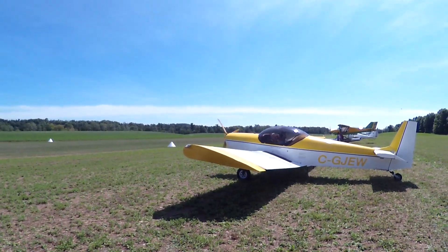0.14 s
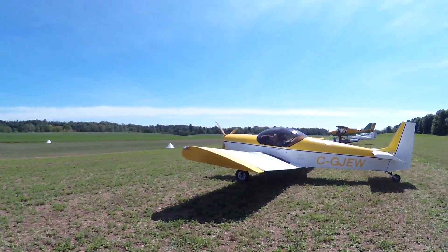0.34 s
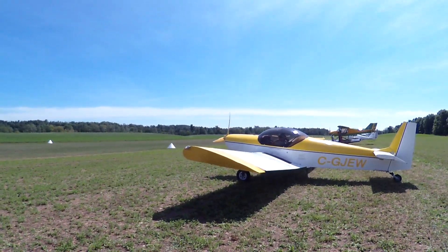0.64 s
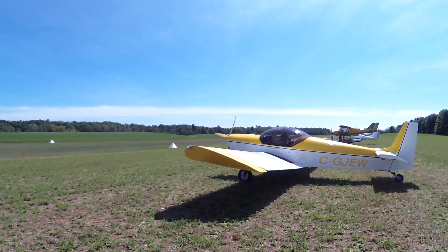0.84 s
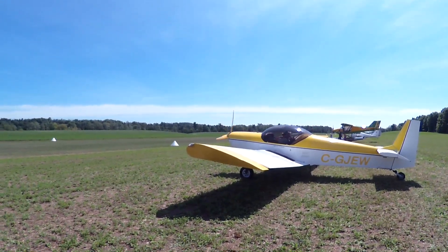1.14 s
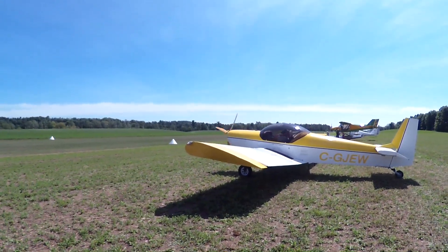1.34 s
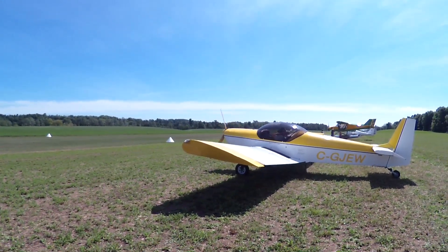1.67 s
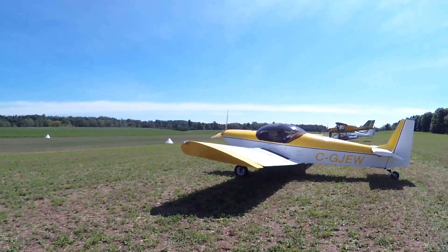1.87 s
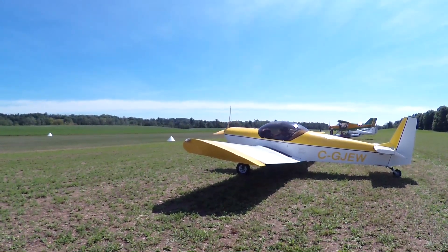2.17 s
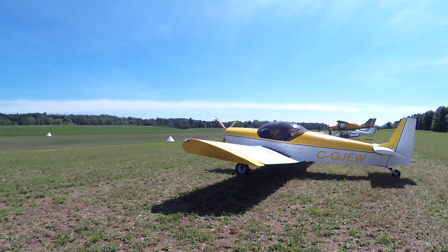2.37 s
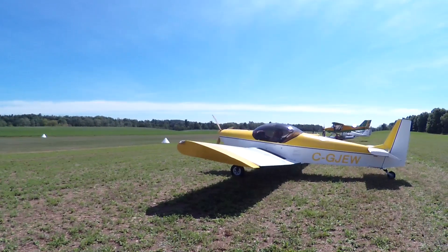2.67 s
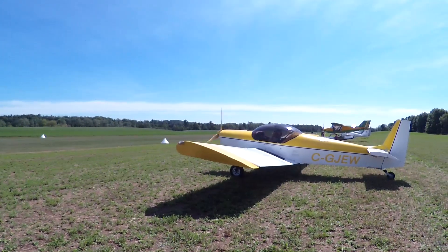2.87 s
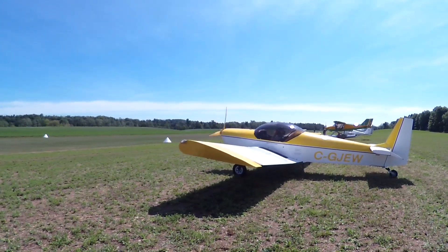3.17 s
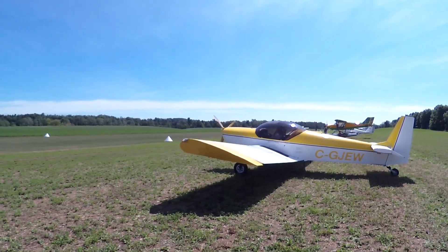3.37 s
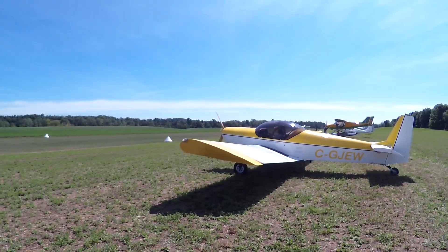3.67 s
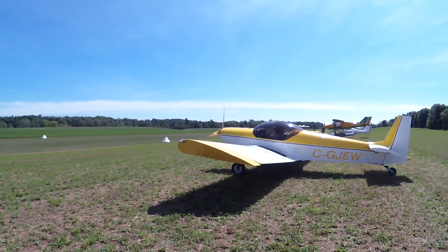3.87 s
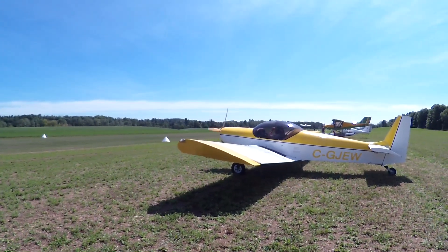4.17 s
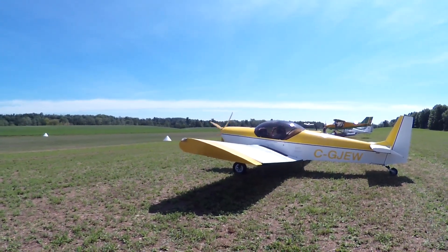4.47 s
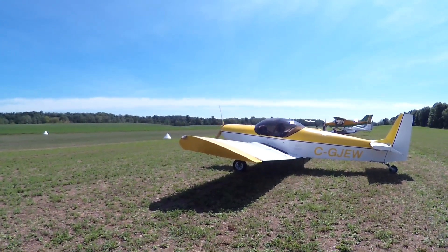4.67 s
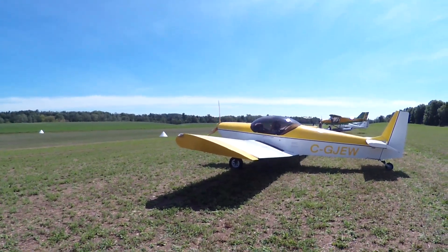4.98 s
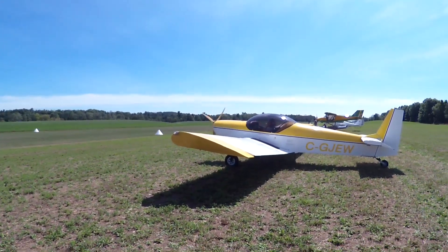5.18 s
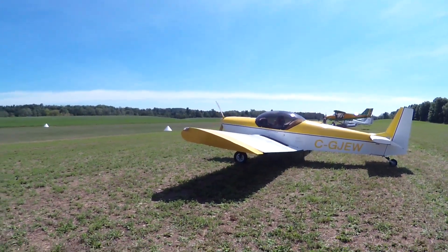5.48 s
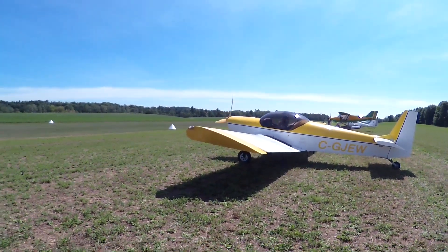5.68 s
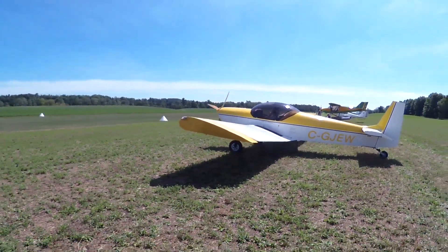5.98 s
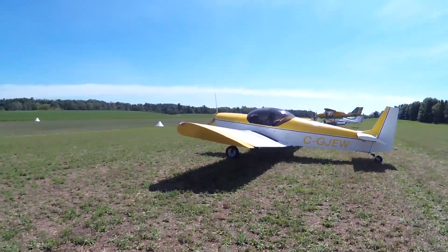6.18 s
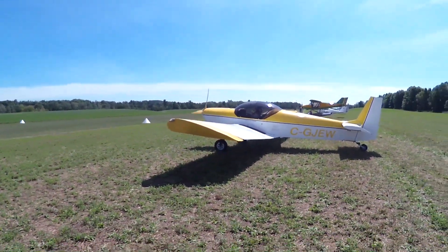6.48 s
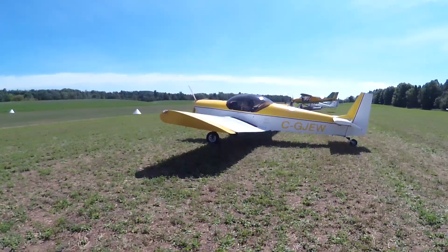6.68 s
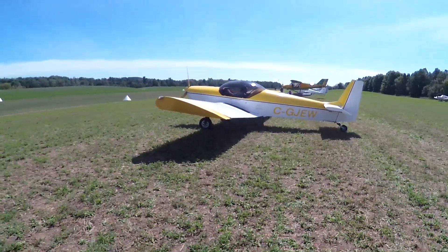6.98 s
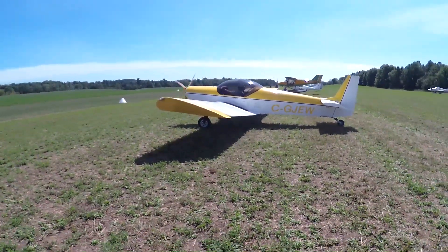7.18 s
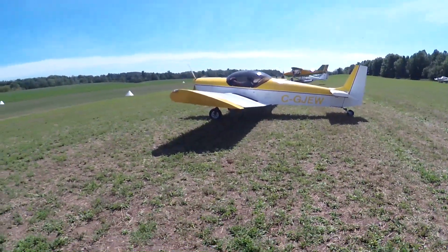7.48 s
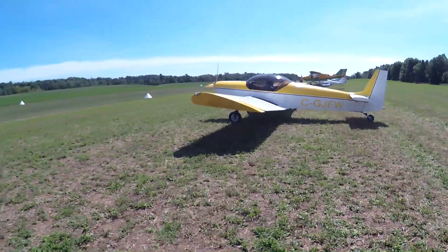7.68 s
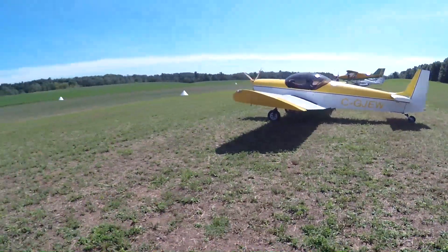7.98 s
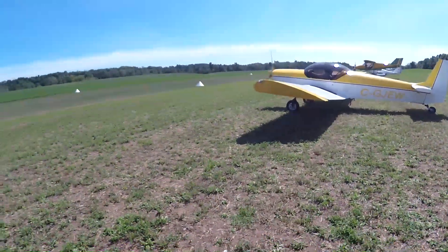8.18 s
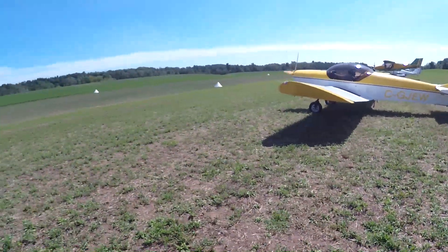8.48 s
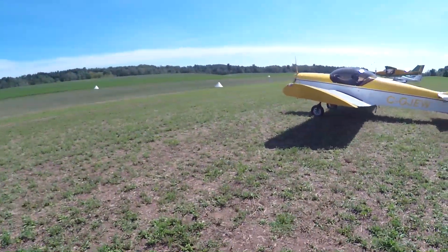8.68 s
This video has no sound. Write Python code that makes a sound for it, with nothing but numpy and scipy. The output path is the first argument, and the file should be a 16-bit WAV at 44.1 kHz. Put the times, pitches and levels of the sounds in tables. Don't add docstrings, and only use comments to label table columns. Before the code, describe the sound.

Continuous aircraft idle in the open air, already running at the start. Heavy bass drone carries a fast, uneven propeller flutter, dry valve rattle and broad cooling-air hiss. Distant engine drone adds slow pulsing. Light wind touches the microphone at first and midway; near the end the microphone turns away, the balance shifts and low gusts buffet hard.

```python
import sys
import numpy as np
from scipy import signal
from scipy.fft import rfft, irfft, next_fast_len
from scipy.io import wavfile
from scipy.ndimage import uniform_filter1d

SR = 44100
rng = np.random.default_rng(int(sys.argv[2]) if len(sys.argv) > 2 else 0)


def gain_from_db(level_db):
    decades = np.asarray(level_db, float) / 20
    return 10 ** decades


def dump(signal):
    limited = np.clip(np.atleast_2d(signal).T, -1, 1)
    pcm = np.round(limited * 32767).astype(np.int16)
    wavfile.write(sys.argv[1], SR, pcm)


N = 389403
SIDES = np.array([[.5], [-.5]])


def rms_one(x):
    return x / np.sqrt(np.mean(x ** 2) + 1e-20)


def noise():
    return rng.standard_normal(N)


def cosine(turns):
    return np.cos(2 * np.pi * turns)


def in_time(rows):
    s, *columns = np.transpose(rows)
    return [np.interp(np.arange(N) / SR, s, c) for c in columns]


def coloured(x, spectrum):
    size = next_fast_len(N)
    hz, db = np.transpose(spectrum)
    bin_hz = np.arange(size // 2 + 1) * SR / size
    gain = gain_from_db(np.interp(np.log(bin_hz + 1), np.log(hz), db, -120))
    return rms_one(irfft(rfft(x, size) * gain, size)[..., :N])


def drift(rate_hz):
    r = np.exp(-80 * np.pi * rate_hz / SR)
    slow = signal.lfilter([1], [1, -2 * r, r * r], rng.standard_normal(N // 40 + 2002))[2000:]
    return np.interp(np.arange(N) / 40, np.arange(len(slow)), rms_one(slow))


def each_turn(turns, spread_db):
    gains = gain_from_db(spread_db * rng.uniform(-1.14, 2.27, 1000))
    return gains[np.floor(turns).astype(int) + 2]


def resonate(x, hz, width_hz):
    r = np.exp(-np.pi * width_hz / SR)
    poles = [1, -2 * r * np.cos(2 * np.pi * hz / SR), r * r]
    return signal.lfilter([(1 - r * r) / 2, 0, (r * r - 1) / 2], poles, x)


def split(x, hz):
    low = signal.sosfilt(signal.butter(2, hz, fs=SR, output="sos"), x)
    return low, x - low


def swells(rows, rise_s, fall_s):
    s, db = np.transpose(rows)[:, :, None]
    late_s = np.arange(0, N, 40) / SR - s
    bumps = db * np.exp(-(late_s / np.where(late_s < 0, rise_s, fall_s)) ** 2)
    return np.interp(np.arange(N) / 40, np.arange(late_s.shape[1]), bumps.max(axis=0))


# time in seconds, firings per second.
SPEED_FIRINGS = [(0.0, 67.11), (0.3, 67.63), (0.6, 68.52), (0.9, 69.78), (1.2, 69.85), (1.6, 70.08),
                 (2.0, 70.81), (3.0, 71.22), (4.0, 71.41), (4.8, 71.35), (5.2, 71.87), (5.6, 71.64),
                 (6.0, 71.94), (7.0, 72.18), (7.5, 71.8), (8.0, 72.21), (8.4, 72.21), (8.83, 72.65)]


def crankshaft():
    first_firing, first_blade = -.4, .2
    blades_per_cycle = 2.64
    speed, = in_time(SPEED_FIRINGS)
    cycle = (np.cumsum(speed) / SR + first_firing) / 4
    blade = blades_per_cycle * (cycle - cycle[0]) + first_blade
    return speed, cycle, blade


# time in seconds, aim aside -1..1, blade-tip share of the slap 0-1,
# ground echo lag in ms.
MIC_SWING = [
    (0, -0.034, 0.22, .55),
    (5.5, 0.028, 0.04, 0.58),
    (6.6, -0.19, 0, 0.63),
    (7.4, -0.15, 0.03, 0.66),
    (7.8, 0.49, .45, 0.54),
    (8.15, .95, 0.46, 0.43),
    (8.3, 0.91, .4, 0.27),
    (8.83, .99, .4, 0.28),
]


def microphone():
    aside, tips, lag_ms = in_time(MIC_SWING)
    off_axis = np.tanh(5 * np.abs(aside))
    return aside, np.clip(aside, 0, 1), off_axis, np.clip(tips, 0, 1), lag_ms


# multiple of the four-stroke cycle, level in
# dB.
EXHAUST_ORDERS = [(1, -53), (2, -88), (3, -42), (4, 1.5), (5, -29.5), (6, -15.5), (7, -33), (8, -14.5),
                  (9, -61), (10, -12), (11, -60), (12, -12.5), (13, -26.5), (14, -53), (15, -37),
                  (16, -16.5), (17, -46), (18, -31), (19, -58), (20, -38.5),
                  (34, -38), (35, -45), (37, -37.5), (39, -45), (47, -40.5)]


def exhaust(cycle, second_db, shade_db):
    silencer_lag_turns, silencer_spread_orders, bank_lead_turns = .7, 4, .17
    out = 0
    for order, db in EXHAUST_ORDERS:
        uneven = order % 4 > 0
        lag = silencer_lag_turns * (1 - np.exp(-max(order - 4, 0) / silencer_spread_orders))
        lag = lag - bank_lead_turns * uneven
        waver = (0.012 if uneven else .007) * (min(order, 20) - 4)
        level_db = db + 10.6 * waver * drift(10)
        level_db = level_db + (second_db + 11.5) * (order == 8) + shade_db * (9 < order < 14)
        out = out + gain_from_db(level_db) * cosine(order * cycle - lag + 0.45 * waver * drift(1.4))
    return np.sqrt(2) * out


# frequency in Hz, density in dB per Hz.
RUMBLE_SPECTRUM = [(15, -37), (25, -16), (46, 11.5), (78, 8), (118, 10.5), (288, 10), (500, -68),
                   (650, -73), (1100, -120)]


def low_rumble():
    return gain_from_db(-34.5) * coloured(noise(), RUMBLE_SPECTRUM)


# time in seconds, level in dB.
FAR_LEVEL = [(0, -27), (.6, -26.5), (1.1, -27), (1.5, -40), (2.1, -33), (2.6, -45), (3.6, -44), (4.5, -29),
             (4.9, -34), (5.6, -33), (6.1, -45), (8.83, -54)]
# time in seconds, firings per second.
FAR_FIRINGS = [(0, 72.25), (.8, 72.1), (1.3, 72.03), (3.5, 72.1), (4, 72.45), (8.83, 72.6)]


def far_engine():
    turns = np.cumsum(in_time(FAR_FIRINGS)[0]) / SR
    first, second = cosine(turns - .07), cosine(2 * turns - .16)
    return gain_from_db(in_time(FAR_LEVEL)[0]) * (gain_from_db(-2.5) * first + second)


# frequency in Hz, density in dB per Hz.
THUMP_SPECTRUM = [(30, -19), (50, -3), (100, 2), (200, -9.5), (340, -7.5), (480, -11), (660, -19.5),
                  (740, -49), (1000, -21.5), (2000, -79)]
# time in seconds, swell in dB over calm.
ROOT_EDDIES = [(.55, 0), (1.05, 5.5), (1.45, 2.5), (3.5, 3.5), (4.4, 2.5), (5.55, 7), (8.15, 6), (8.6, 6)]


def blade_thump(blade):
    clicks = np.zeros(N)
    for place, steady, loose in [(0.95, -0.27, 0.94), (0.71, -0.15, 0.38),
                                 (.92, 0.29, 0.73), (0.026, 0.0076, 0.73)]:
        passing = np.diff(np.floor(blade - place), prepend=0) > 0
        clicks += passing * (steady + .9 * loose * drift(3.5))
    level_db = -1.5 + swells(ROOT_EDDIES, rise_s=0.33, fall_s=0.31)
    return gain_from_db(level_db - 34) * coloured(clicks, THUMP_SPECTRUM)


# frequency in Hz, density in dB per Hz.
SLAP_SPECTRUM = [(250, -39), (450, -8), (760, 0), (1250, 7.5), (1800, -0.5), (2400, -5), (4000, -39),
                 (9000, -31)]
# frequency in Hz, density in dB per Hz.
TIP_SPECTRUM = [(300, -27), (600, -14), (1300, 2), (2100, 0), (2600, -12), (4000, -20), (9000, -45)]
# time in seconds, swell in dB over calm.
BLADE_EDDIES = [(.5, 1), (1.15, 3.5), (1.8, 2), (2.15, 6.5), (2.85, 5), (3.5, 0.5), (4.6, 2.5), (5.05, 3),
                (5.36, 3.5), (5.8, 6), (6.6, 4), (7.55, 3), (8.6, 2)]


def blade_slap(blade, tips, turned):
    white = noise()
    eddies = (1 - tips) * coloured(white, SLAP_SPECTRUM) + tips * coloured(white, TIP_SPECTRUM)
    eddies = eddies / (uniform_filter1d(eddies ** 2, size=160) + .05) ** .35
    ahead = (blade - .05 + 0.031 * drift(30) + .5) % 1 - .5
    swell = np.exp(-np.abs(ahead) / np.where(ahead < 0, .17, .1))
    uneven = 1 + 0.18 * cosine((blade - 2.8) / 3)
    luck = each_turn(blade - .4, 1.3) * gain_from_db(drift(10.4))
    level_db = -40.5 + 1.5 * turned + swells(BLADE_EDDIES, rise_s=0.24, fall_s=0.19)
    return gain_from_db(level_db) * rms_one(eddies * swell * uneven * luck)


# place in the cycle 0-1, length 0-1, casing ring in dB, bright tick in dB.
VALVE_EVENTS = [
    (.01, .09, -43.5, -50),
    (0.282, 0.02, -48.5, -42),
    (.51, 0.07, -44.5, -47),
    (.77, 0.01, -49.5, -61),
]
# frequency in Hz, width in Hz, level facing in dB, level turned away in dB.
CASING_MODES = [(2950, 200, -1, -3), (3140, 85, 7.5, 0), (3580, 220, 2, 6), (4980, 350, -2, -4)]
# frequency in Hz, density in dB per Hz.
TICK_SPECTRUM = [(4000, -44), (6500, 2.5), (8600, 15.5), (12000, 4.5), (14000, 9), (15800, -3)]


def valve_gear(cycle, turned):
    rattle, tick = 0, 0
    for place, length, ring_db, tick_db in VALVE_EVENTS:
        apart = np.abs((cycle - place + .5) % 1 - .5)
        luck = each_turn(cycle - place + .5, 2.27)
        rattle = rattle + gain_from_db(ring_db) * luck * np.exp(-apart / length)
        tick = tick + gain_from_db(tick_db) * luck * np.exp(-apart / 0.015)
    knock = rattle * noise()
    ring = 0
    for hz, width_hz, facing_db, away_db in CASING_MODES:
        mode_db = facing_db + turned * (away_db - facing_db)
        ring = ring + gain_from_db(mode_db) * resonate(knock, hz, width_hz)
    return gain_from_db(15.5) * ring + gain_from_db(7.0) * tick * coloured(noise(), TICK_SPECTRUM)


# frequency in Hz, density in dB per Hz.
HISS_SPECTRUM = [(180, -10.5), (330, -8), (450, -14.5), (740, -14.5), (1240, -16.5), (2440, -21),
                 (3130, -18.5), (5050, -25), (5500, -30.5), (6900, -24.5), (8570, -24.5), (12300, -27),
                 (14200, -30.5), (15800, -37)]


def cooling_air(cycle, blade, below_idle, off_axis):
    chop_db = 0.21 * cosine(4 * cycle) + 1.02 * cosine(blade + 0.089) + 0.15 * cosine((blade - 2.2) / 3)
    body, top = split(coloured(noise(), HISS_SPECTRUM), 3600)
    body = gain_from_db(0.25 * drift(12)) * body
    top = gain_from_db(chop_db + 0.21 * drift(20) + 0.71 * drift(69)) * top
    level_db = -32.5 + 0.14 * below_idle - 0.4 * off_axis
    return gain_from_db(level_db) * (body + top)


def delayed(bright, lag_ms):
    return np.interp(np.arange(N) - lag_ms * SR / 1000, np.arange(N), bright)


# frequency in Hz, density in dB per Hz.
SCATTER_SPECTRUM = [(180, -31), (300, -12), (315, -10), (663, -6.5), (1150, -10.5), (1600, -19),
                    (1910, -17), (2360, -25), (2980, -19.5), (4010, -28), (4890, -21), (11700, -19.5),
                    (15500, -24)]


def port_difference(bright, thump, flank, turned, off_axis):
    scatter_db = -46 + 1.5 * turned + 0.62 * drift(25)
    side = 2 * gain_from_db(scatter_db) * coloured(noise(), SCATTER_SPECTRUM)
    side = side + 0.14 * split(bright, 6240)[1]
    side = side + 0.36 * resonate(bright, 830, 370)
    side = side - 0.16 * off_axis * flank
    side = side + 0.25 * np.gradient(bright) + 6.2 * np.gradient(thump)
    return SIDES * side


# frequency in Hz, density in dB per Hz.
GUST_SPECTRUM = [(8, -7), (20, -10), (45, -5), (90, -18), (200, -24), (500, -38), (2000, -100)]
# time in seconds, swell in dB over the breeze.
GUST_SWELLS = [
    (0, 10),
    (4.55, 9),
    (6.55, 9),
    (8.03, 18),
    (8.32, 26.5),
    (8.53, 17),
    (8.8, 17),
]


def wind():
    gust_db = swells(GUST_SWELLS, rise_s=.12, fall_s=0.17)
    level_db = -45.5 + gust_db + 2.3 * drift(8.8) - drift(2.7)
    return gain_from_db(level_db) * coloured(rng.standard_normal((2, N)), GUST_SPECTRUM), gust_db


def scene():
    speed, cycle, blade = crankshaft()
    aside, turned, off_axis, tips, lag_ms = microphone()
    idle_firings = 71.4
    below_idle = np.minimum(speed - idle_firings, 0)
    above_idle = np.maximum(speed - idle_firings, 0)

    tone_db = -14.9 + 0.3 * below_idle
    second_db = -6.5 - 3.5 * above_idle
    shade_db = -1.5 * (turned + off_axis)
    thump = blade_thump(blade)
    bass = gain_from_db(tone_db) * exhaust(cycle, second_db, shade_db) + low_rumble() + far_engine() + thump

    bright = blade_slap(blade, tips, turned) + valve_gear(cycle, turned)
    bright = bright + cooling_air(cycle, blade, below_idle, off_axis)
    echo = delayed(bright, lag_ms)
    flank = split(bright + echo, 4000)[0]
    bright = bright + (0.15 + 0.39 * tips) * split(echo, 3340)[0]

    bass_pan_db, treble_pan_db = -3 - 3.5 * aside, -1.7 - 2 * aside
    stereo = bass * gain_from_db(SIDES * bass_pan_db) + bright * gain_from_db(SIDES * treble_pan_db)
    stereo = stereo + port_difference(bright, thump, flank, turned, off_axis)
    gusts, gust_db = wind()
    duck_db = -0.12 * np.maximum(gust_db - 15, 0)
    return gain_from_db(duck_db) * stereo + gusts


def low_pass(x):
    return signal.sosfilt(signal.butter(12, 15760, fs=SR, output="sos"), x)


def record(dry):
    mix = 1.792 * np.tanh(dry / 1.406)
    return low_pass(mix)


dry = scene()
out = record(dry)
dump(out)
```